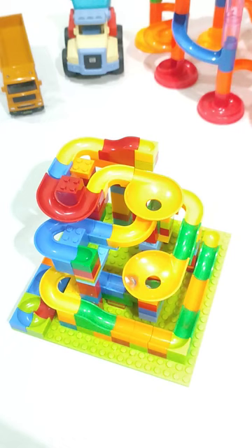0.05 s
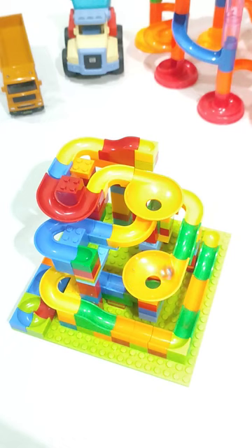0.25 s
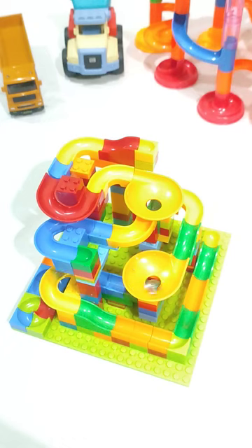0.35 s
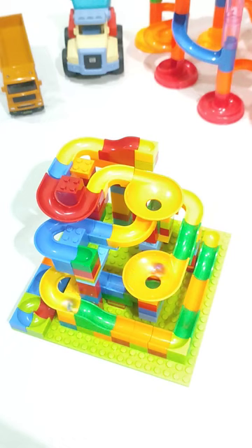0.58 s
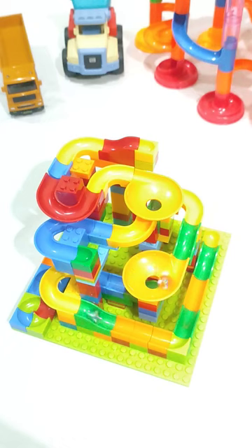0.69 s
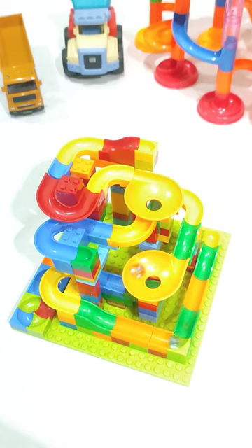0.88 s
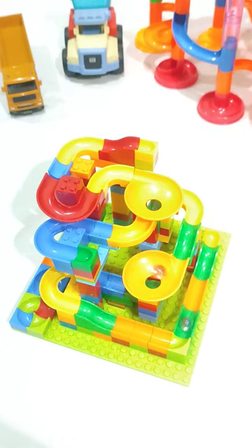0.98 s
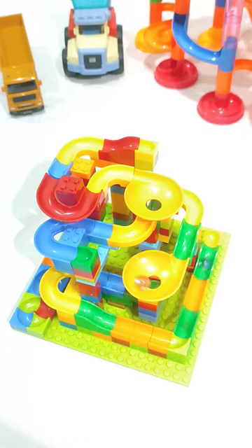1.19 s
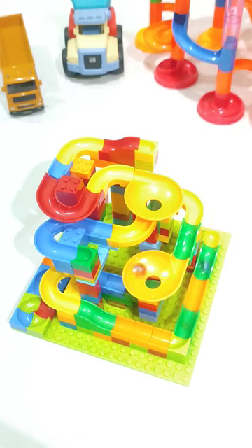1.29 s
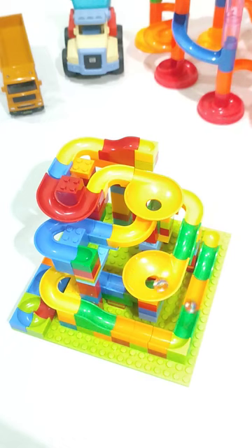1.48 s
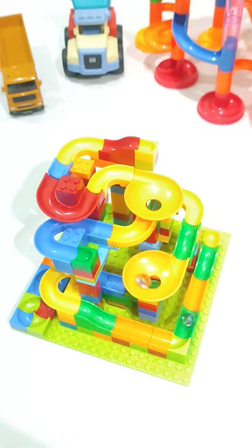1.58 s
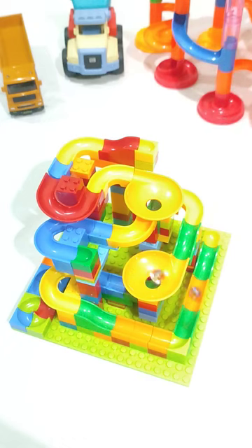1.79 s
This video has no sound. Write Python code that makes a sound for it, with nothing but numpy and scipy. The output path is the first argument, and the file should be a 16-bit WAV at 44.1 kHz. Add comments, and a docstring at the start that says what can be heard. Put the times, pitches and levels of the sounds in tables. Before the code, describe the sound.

Glass marbles rattle down a plastic toy track, knocking through bends and circling in a funnel.

```python
"""A small, fairly live room: glass marbles run down a plastic toy track.
One knocks through bends and over joints: noise bursts plus decaying sines of single pieces and the track.
Another circles in a funnel; the rolling is random trains of tiny bumps, convolved with short bursts.
Sharp glassy clicks are very short noise bursts. Each source feeds a diffuse noise tail for the room.
Coloured noise makes a faint room rumble; a sine makes a low hum that fades out early."""
import sys
import numpy as np
from scipy import signal
from scipy.fft import rfft, irfft
from scipy.io import wavfile

SR = 44100
rng = np.random.default_rng(int(sys.argv[2]) if len(sys.argv) > 2 else 0)


def wav_record(signal):
    """Record a signal, one row per channel, as 16-bit PCM in the file named by sys.argv[1]."""
    frames = np.transpose(np.atleast_2d(signal))
    bounded = np.clip(frames, -1, 1)
    # unit amplitude maps onto the largest positive 16-bit level
    quanta = np.round(bounded * 32767).astype(np.int16)
    wavfile.write(sys.argv[1], SR, quanta)


N = 79380

# Short, overlapping modes of the plastic. Each row: frequency in Hz, relative density in dB per Hz.
CLATTER_COLOUR = [(200, -61.5), (450, -3), (750, -13.5), (1100, -11.5), (1700, 2.5), (2200, 0.5),
                  (3000, 2.5), (4200, 2), (5600, -6), (7400, 3), (9500, -10), (12500, -4.5), (15000, -18)]


def from_db(db):
    """Decibels to gain."""
    return 10 ** (np.asarray(db) / 20)


def at_hz(points, hz):
    """Interpolate a table on a log-frequency axis."""
    point_hz, values = np.transpose(points)
    return np.interp(np.log(hz + 1e-9), np.log(point_hz), values)


def rms_one(x):
    """Scale to unit rms."""
    return x / np.sqrt(np.mean(x ** 2) + 1e-20)


def tone(hz, thin_hz, dull_hz):
    """Gain of a contact that is thin below one frequency and dull above another."""
    low_loss = hz ** 2 + thin_hz ** 2 + 1e-9
    high_loss = 1 + np.square(hz / dull_hz) ** 2
    return hz / np.sqrt(low_loss * high_loss)


def noise(size, colour, side_db, thin_hz=0, dull_hz=np.inf):
    """Stereo random-phase noise with a given colour and side-to-mid ratio; rms 1."""
    hz = np.arange(size // 2 + 1) * SR / size
    mid, side = np.exp(2j * np.pi * rng.random((2, len(hz))))
    width = from_db(at_hz(side_db, hz))
    gain = from_db(at_hz(colour, hz)) * tone(hz, thin_hz, dull_hz) / np.sqrt(1 + width ** 2)
    left_right = mid + width * side * np.array([[1], [-1]])
    return rms_one(irfft(gain * left_right, size))


def dying(t60_s):
    """Exponential decay of 60 dB per t60 (at least 1 ms), 8192 samples long."""
    return np.exp(-np.log(1000) * np.arange(8192) / SR / max(t60_s, 1e-3))


def burst(colour, t60_s, thin_hz=0, dull_hz=np.inf, attack_s=0.00021):
    """Countless overlapping modes struck together: shaped noise with the rms of its decay."""
    # Width of the direct sound. Each row: frequency in Hz, side against mid in dB.
    direct_side_db = [(200, -3), (900, -32.5), (1600, -6.5), (3000, -3.5), (5000, -3), (8000, -0.5),
                      (14000, 3.5)]
    envelope = dying(t60_s)
    rise = 1 - np.exp(-np.arange(len(envelope)) / SR / attack_s)
    modes = noise(len(envelope), colour, direct_side_db, thin_hz, dull_hz)
    return rms_one(modes * envelope * rise) * np.sqrt(np.mean(envelope ** 2))


def ring(hz, t60_s, spread_rad=0.26, attack_s=0.00054):
    """One mode: a decaying sine, slightly out of phase between left and right."""
    envelope = dying(t60_s)
    t = np.arange(len(envelope)) / SR
    offset_rad = spread_rad * np.array([[1], [-1]]) * rng.choice([-1, 1])
    phase = rng.uniform(0, 2 * np.pi) + offset_rad
    rise = 1 - np.exp(-t / attack_s)
    return envelope * rise * np.sin(2 * np.pi * hz * t + phase)


def add(out, start_s, sound, pan_db):
    """Mix in a sound, panned by a left-right level difference."""
    start = max(int(start_s * SR), 0)
    part = sound[:, :N - start] * from_db([[pan_db / 2], [-pan_db / 2]])
    out[:, start:start + part.shape[1]] += part


def background():
    """Room rumble as coloured noise, with a faint low sine hum that fades out."""
    # Room rumble. Each row: frequency in Hz, relative density in dB per Hz.
    air_colour = [(12, -26), (30, 4.5), (60, 1), (100, -5), (150, -8), (210, -16.5), (400, -19.5),
                  (1000, -17), (4000, -27), (14000, -52.5)]
    air_db, air_side_db = -61.5, -5.5
    hum_hz, hum_db, hum_fade_s = 159, -70.5, (0.11, 0.24)  # rms before fade; fade start, end
    t = np.arange(N) / SR
    fade = np.interp(t, hum_fade_s, [1, 0])
    hum = from_db(hum_db) * fade * np.sqrt(2) * np.sin(2 * np.pi * hum_hz * t)
    air = from_db(air_db) * noise(N, air_colour, [(1, air_side_db), (SR, air_side_db)])
    return hum + air


def bumps(colour, t60_s, pieces=4):
    """Tiny random bumps under a rolling marble, dealt to several pieces of track; rms 1."""
    bumps_per_s, bump_spread_db = 1500, 6  # mean rate over all pieces
    out = 0
    for _ in range(pieces):
        excess_db = bump_spread_db * np.minimum(rng.exponential(1, N), 4)
        sizes = from_db(excess_db) * rng.choice([-1, 1], N)
        train = sizes * (rng.random(N) < bumps_per_s / pieces / SR)
        out = out + signal.fftconvolve(train[None], burst(colour, t60_s), axes=1)[:, :N]
    return rms_one(out)


def flutter():
    """Unevenness of the rolling contact: a gain that wanders quickly at random."""
    steps_per_s, deviation_db = 45, 3.5  # dB per unit of the normal draw, clipped at 2
    steps = np.clip(rng.standard_normal(1024), -2, 2)
    wander = np.interp(np.arange(N) / SR * steps_per_s, np.arange(len(steps)), steps)
    return from_db(deviation_db * wander)


def rolling():
    """Hollow rumble and gritty treble from contact bumps, swelling and fading along the run."""
    # Each row: time in seconds, rumble level in dB, grit level in dB (before roll_db and flutter).
    roll_levels = [(0, -50.5, -73), (.085, -70.5, -72.5), (.12, -60, -65.5), (0.272, -49, -48),
                   (.42, -58.5, -75), (.53, -59.5, -59), (.63, -62, -72.5), (.74, -55.5, -55.5),
                   (.84, -63.5, -64), (0.908, -51.5, -52.5), (.99, -61.5, -51), (1.06, -57.5, -57.5),
                   (1.15, -55.5, -54.5), (1.26, -53.5, -58.5), (1.352, -52, -47.5), (1.42, -79, -79),
                   (1.468, -51.5, -56.5), (1.55, -60, -98.5), (1.66, -59.5, -65), (1.8, -69.5, -73.5)]
    # Hollow rumble. Each row: frequency in Hz, relative density in dB per Hz.
    rumble_colour = [(250, -52), (550, -9), (800, 4), (1200, 5.5), (1600, 7.5), (2100, -17), (3500, -15),
                     (8000, -15)]
    # Gritty treble. Each row: frequency in Hz, relative density in dB per Hz.
    grit_colour = [(900, -34), (1800, 1), (2400, 10), (3400, -0.5), (4800, -28), (7500, -10), (14000, -65)]
    roll_db = -2
    time_s, rumble_db, grit_db = np.transpose(roll_levels)
    t = np.arange(N) / SR
    rumble = from_db(np.interp(t, time_s, rumble_db)) * bumps(rumble_colour, t60_s=0.083)
    grit = from_db(np.interp(t, time_s, grit_db)) * bumps(grit_colour, t60_s=0.018)
    return from_db(roll_db) * flutter() * (rumble + grit)


def track_ring(thin_hz, dull_hz, uneven_db=2):
    """Modes of the whole track swell as the blow spreads, with new strengths at every contact."""
    # Each row: frequency in Hz, relative level in dB (before modes_db), t60 in seconds.
    track_modes = [(786.5, 15.5, .08), (1122, 24, 0.048), (1270, 6, 0.031), (1427.4, 17, 0.063),
                   (1620, -19, 0.082), (1620, 10, 0.1), (1760, 6, 0.044), (2150, 8, 0.044),
                   (2551, 22.5, 0.054), (2520, -21, 0.04), (2970, -3, 0.074), (3030, -18, 0.045),
                   (3400, -22, 0.06), (3580, 2, .07)]
    modes_db = -26.5  # against the clatter
    out = 0
    for hz, db, t60_s in track_modes:
        strength = from_db(modes_db + db + uneven_db * rng.normal())
        mode = ring(hz, t60_s, spread_rad=0.56, attack_s=0.0053)
        out = out + strength * tone(hz, thin_hz, dull_hz) * mode
    return out


def knocks(chatters=3):
    """A blow makes plastic clatter, rings the struck piece and track, then chatters as the marble settles."""
    # Each row: start in seconds, clatter level in dB, clatter t60 in seconds, dull above in Hz,
    # pitch of the struck piece in Hz, its ring level in dB, its t60 in seconds, left-right in dB.
    knock_events = [(0.001, -45, 0.13, 4300, 1206, -40.5, 0.021, 2),
                    (0.128, -66, 0.061, 2600, 1174, -55.5, 0.096, -3),
                    (0.174, -42.5, 0.021, 4050, 1172, -46, 0.12, 1.5),
                    (0.2040, -22, 0.02, 8500, 3263, -8, .010, -4.5),
                    (0.2111, -37, 0.043, 5000, 1097, -26, 0.055, 1),
                    (0.2206, -45, .02, 4000, 3120, -62, 0.02, -7),
                    (0.2407, -27, 0.013, 5100, 2940, -16, 0.0091, 0),
                    (0.251, -37.5, 0.1, 4270, 2920, -49, 0.034, 0),
                    (0.284, -38.5, 0.034, 3960, 2570, -59, 0.036, -4),
                    (0.3281, -41, 0.062, 3060, 1066, -36, 0.081, 2),
                    (0.3380, -43, .03, 3480, 2910, -34, 0.025, -4),
                    (0.363, -36, 0.032, 2780, 1217, -40.5, 0.033, .5),
                    (0.3981, -35, 0.042, 2780, 3555, -25.5, 0.013, -0.5),
                    (0.5874, -57.5, 0.016, 9000, 1440, -79, 0.042, -9),
                    (0.6200, -60, 0.066, 5000, 3100, -66, .06, 0),
                    (0.6560, -57, 0.099, 2200, 786, -56, 0.042, 0),
                    (0.7240, -52, 0.039, 4000, 2910, -53, 0.1, -3),
                    (0.787, -46, 0.029, 4580, 2195, -42.5, 0.038, 1),
                    (0.856, -57, 0.27, 4000, 1870, -49.5, 0.16, -.5),
                    (0.8761, -41, 0.049, 5000, 2265, -38.5, 0.047, -1),
                    (0.895, -43.5, 0.087, 6000, 1833, -37, 0.045, 1),
                    (0.945, -51.5, 0.24, 7050, 3620, -39.5, 0.041, -7.5),
                    (1.0191, -34.5, 0.07, 5870, 2395, -30.5, .025, -2),
                    (1.0400, -41.5, 0.11, 6060, 1114, -41.5, 0.1, 3.5),
                    (1.046, -39, 0.026, 6000, 2920, -57, 0.035, -5),
                    (1.0640, -39, 0.023, 6000, 1180, -39, 0.038, 2),
                    (1.0957, -36, 0.07, 6000, 1830, -39.5, 0.017, 0.5),
                    (1.2105, -42, 0.076, 3860, 1050, -50, 0.057, -1.5),
                    (1.2808, -31.5, 0.024, 6400, 1628, -27, .035, 0),
                    (1.305, -46, 0.012, 2020, 1420, -36.5, 0.022, -3),
                    (1.3182, -30.5, 0.026, 4170, 1560, -30.5, 0.033, 0.5),
                    (1.3205, -40, .03, 4940, 3670, -30, 0.036, -4),
                    (1.4422, -53, .11, 4020, 1627, -53.5, 0.23, -.5),
                    (1.5060, -40.5, 0.068, 4300, 1657, -46.5, 0.079, -3),
                    (1.5070, -54, 0.023, 5000, 3730, -39, 0.027, -5),
                    (1.568, -53.5, 0.078, 1990, 1290, -49, .06, 2),
                    (1.6049, -46, 0.012, 2400, 1060, -46, 0.019, 1.5),
                    (1.6418, -43.5, 0.041, 2340, 1160, -37, 0.026, 1),
                    (1.693, -51.5, 0.055, 3020, 1240, -51, .04, -2)]
    attack_s = 0.00024
    thin_share = 0.45  # high-pitched pieces are small: clatter thins below this share of pitch
    chatter_s, chatter_t60_s = 0.004, 0.024  # spacing before random scaling, decay
    chatter_db, chatter_loss_db = -13.5, 6.5  # first against the knock, drop per repeat
    out = np.zeros((2, N))
    for start_s, db, t60_s, dull_hz, hz, ring_db, ring_t60_s, pan_db in knock_events:
        thin_hz = thin_share * hz
        clatter = burst(CLATTER_COLOUR, t60_s, thin_hz, dull_hz, attack_s)
        blow = from_db(db) * (clatter + track_ring(thin_hz, dull_hz))
        piece = from_db(ring_db) * ring(hz, ring_t60_s)
        add(out, start_s, blow + piece, pan_db)
        delays_s = np.cumsum(chatter_s * rng.uniform(0.63, 1.3, chatters))
        for k, delay_s in enumerate(delays_s):
            gain = from_db(db + chatter_db - k * chatter_loss_db)
            chatter = gain * burst(CLATTER_COLOUR, chatter_t60_s, thin_hz, dull_hz)
            add(out, start_s + delay_s, chatter, pan_db)
    return out


def clicks():
    """Hard contacts of glass, and one early reflection off the table (at 0.9922 s), as bright bursts."""
    # Each row: start in seconds, level in dB, t60 in seconds, left-right in dB.
    click_events = [(0.1735, -56, 0.01, 4), (0.203, -26.5, 0.0062, 1), (0.2433, -31, 0.0027, -1),
                    (0.389, -57, 0.0049, 3), (0.467, -68, .01, 3), (0.475, -52, 0.024, -1.5),
                    (0.522, -50, 0.038, -1), (0.531, -43, 0.0076, -1), (0.563, -63, 0.016, 10.5),
                    (0.585, -43, 0.014, -4.5), (0.658, -55, 0.013, -1), (0.692, -66, 0.017, 5),
                    (0.714, -51.5, 0.039, -6), (0.7978, -22, 0.0048, -2.5), (0.897, -26.5, 0.017, -4),
                    (0.9892, -21, 0.0038, 1.5), (0.9922, -33.5, 0.0014, 23), (1.0492, -30, 0.0046, -16),
                    (1.0542, -33.5, 0.0057, 13), (1.059, -29, 0.0058, -5), (1.0650, -36, 0.0073, -5),
                    (1.0972, -30.5, 0.021, -12.5), (1.2812, -56, 0.004, -4), (1.4216, -48, 0.02, -1),
                    (1.4428, -42.5, 0.029, -1.5), (1.5078, -50, .02, 2), (1.537, -43, 0.0052, -5),
                    (1.628, -65, 0.0075, -1), (1.694, -62, 0.017, 3), (1.752, -57, 0.053, -1.5),
                    (1.791, -51, 0.035, -2)]
    # Colour of a click. Each row: frequency in Hz, relative density in dB per Hz.
    glass_colour = [(500, -15), (1200, -22), (2300, -7.5), (3800, -12), (5200, -2), (6500, -0.5), (8000, 3),
                    (9700, -4), (12000, 1), (14000, -3.5), (15500, -25)]
    out = np.zeros((2, N))
    for start_s, db, t60_s, pan_db in click_events:
        add(out, start_s, from_db(db) * burst(glass_colour, t60_s, attack_s=0.00047), pan_db)
    return out


def room(x):
    """A diffuse tail that builds up quickly and dies at its own rate in each band."""
    # Width of the tail. Each row: frequency in Hz, side against mid in dB.
    tail_side_db = [(200, -4.5), (1000, -1.5), (2000, -1), (4000, 3.5), (14000, 2.5)]
    # Each row: band centre in Hz, t60 in seconds.
    band_t60 = [(300, 0.17), (1200, 0.26), (3000, 0.3), (7000, 0.31), (14000, 0.25)]
    gap_s, build_s = 0.001, 0.0021
    ease_s, ease_db = 0.013, -0.5  # the tail eases down slightly: time it takes and size
    size = 32768
    t, hz = np.arange(size) / SR, np.arange(size // 2 + 1) * SR / size
    white = rfft(noise(size, [(1, 0), (SR, 0)], tail_side_db))
    centres_hz, t60s_s = np.transpose(band_t60)
    tail = 0
    for share, t60_s in zip(np.eye(len(t60s_s)), t60s_s):  # bands crossfade into their neighbours
        band = irfft(white * at_hz(np.c_[centres_hz, share], hz))
        tail = tail + band * np.exp(-np.log(1000) * t / t60_s)
    tail = tail * (1 - np.exp(-np.maximum(t - gap_s, 0) / build_s))
    tail = tail * from_db(ease_db * np.clip(t / ease_s, 0, 1) ** 4)
    feed = rms_one(x[0] + x[1]) * np.sqrt(np.mean(x ** 2))
    return signal.fftconvolve(feed[None], rms_one(tail) / np.sqrt(size), axes=1)[:, :N]


def scene():
    """Rolling, knocks and clicks, each with its share of the room, over the background."""
    low_cut_hz = 484  # the small pieces radiate little bass
    sources = [(rolling(), -5), (knocks(), -5), (clicks(), -0.5)]  # with room level in dB
    marbles = sum(x + from_db(room_db) * room(x) for x, room_db in sources)
    low_cut = signal.butter(3, low_cut_hz, "high", fs=SR, output="sos")
    return background() + signal.sosfilt(low_cut, marbles)


def record(dry):
    """Cut the top steeply, 60 dB down from the stopband edge."""
    stop_hz = 15600
    return signal.sosfilt(signal.cheby2(12, 60, stop_hz, fs=SR, output="sos"), dry)


dry = scene()
out = record(dry)
wav_record(out)
```